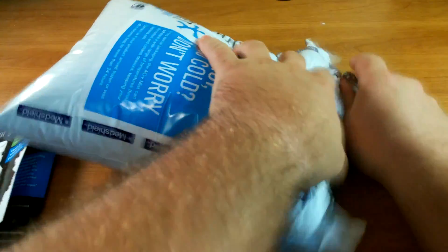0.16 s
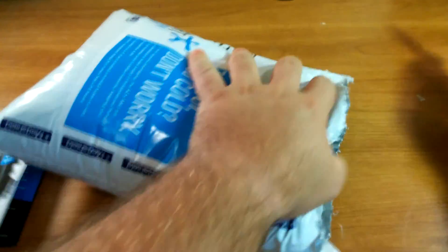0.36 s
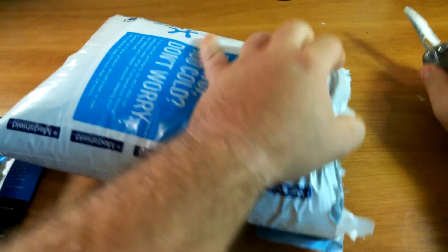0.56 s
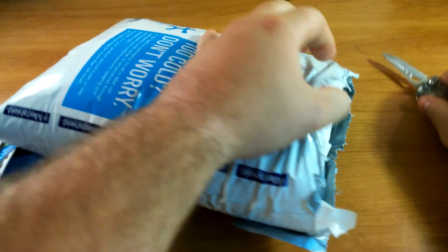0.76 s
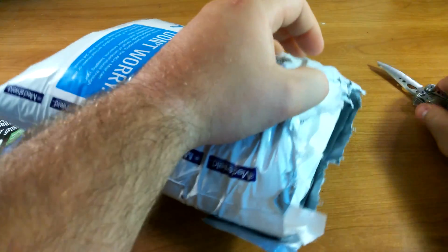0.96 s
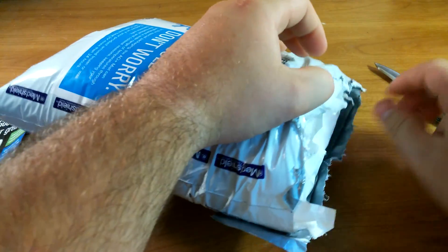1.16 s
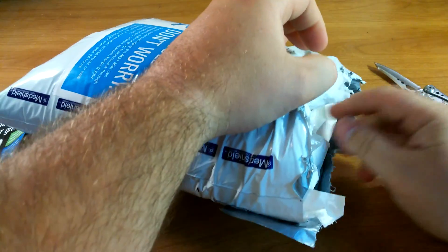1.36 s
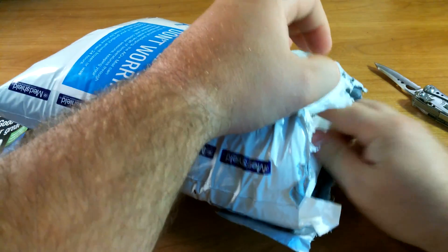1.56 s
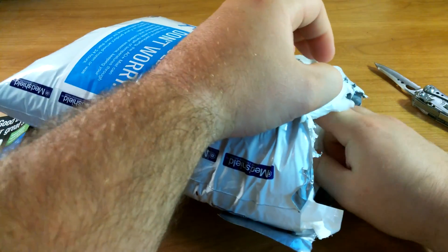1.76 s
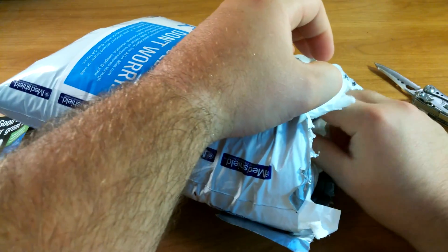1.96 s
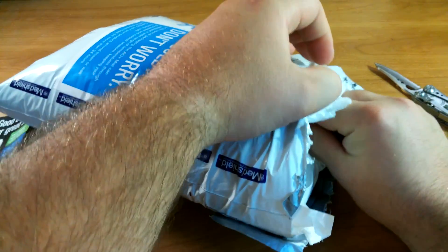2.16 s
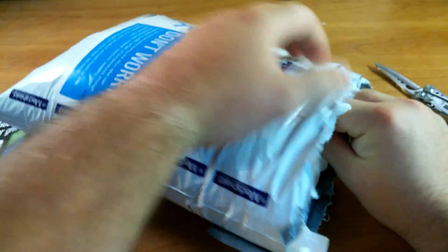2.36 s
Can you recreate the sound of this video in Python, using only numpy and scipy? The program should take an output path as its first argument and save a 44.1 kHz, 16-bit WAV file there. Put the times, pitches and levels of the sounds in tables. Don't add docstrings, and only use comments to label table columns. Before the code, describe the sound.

Close-up crinkling of a thick plastic mailing bag: a strained start, sharp rip with a boomy thump, more pops, a steel tool rattling onto the wooden table, then irregular crackles in a small quiet room.

```python
import sys
import numpy as np
from scipy import signal
from scipy.io import wavfile
from scipy.ndimage import uniform_filter1d

SR = 44100
rng = np.random.default_rng(int(sys.argv[2]) if len(sys.argv) > 2 else 0)


def volts_from_db(level):
    exponent = np.asarray(level, float) / 20
    return 10 ** exponent


def wav_record(signal):
    frames = np.transpose(np.atleast_2d(signal))
    bounded = np.clip(frames, -1, 1)
    quanta = np.round(bounded * 32767).astype(np.int16)
    wavfile.write(sys.argv[1], SR, quanta)


N = 105840

# (frequency [Hz], level [dB])
HUSH_SPECTRUM = [(15, -50), (25, 37), (175, -40), (335, 10.5), (659, -27.5), (863, 9.5), (1290, -36.5),
                 (16000, -11)]
# (frequency [Hz], t60 [s])
ROOM_DECAY = [(100, 0.58), (1000, 0.11), (5000, 0.33), (14000, 0.049)]
# (frequency [Hz], left minus right [dB])
STEREO_LEAN = [(300, 0.5), (2000, 0.5), (9000, -11), (14000, -3)]
# (time [s], strength [dB], rattle t60 [s], boom level [dB], contact [s])
TABLE_BLOWS = [
    (0.2261, -2, 0.088, -6, 0.00044),
    (.868, -9, 0.17, -13.5, 0.000031),
    (0.91, -17.5, 0.18, -17, 0.00029),
    (0.975, -21, 0.1, -32, 0.0016),
    (1.0635, -17, 0.057, -19.5, 0.00063),
    (1.088, -16.5, 0.13, -26, 0.0002),
]
# (frequency [Hz], level [dB], t60 [s])
BARE_TABLE_MODES = [(270, -5, .035), (335, 4, .09), (420, 7, .035), (540, 3, .03), (820, 11, .045),
                    (960, 1, .03), (1050, 5, .015), (1300, 2, .018), (1650, 0, .02), (2080, -2, .02)]
# (frequency [Hz], level [dB], t60 [s])
DAMPED_TABLE_MODES = [(353, 0, .05), (582, 1, .025), (666, 6.5, 0.018), (933, 12.5, 0.019),
                      (1211, 5, 0.035), (1525, 1.5, .02), (1770, 2.5, .03)]
# (time [s], rustle level [dB], treble share [dB])
TEAR_EFFORT = [(0, -38, -3), (.1, -45.5, -11.5), (.192, -52.5, -6), (.2, -29.5, 3), (.235, -20.5, -16.5),
               (.3, -33.5, -2.5), (.39, -38, -0.5), (.44, -43, -10.5), (.48, -30, -3.5), (.58, -43, -7.5),
               (.72, -41, -15), (.76, -55.5, -13), (.86, -52.5, -12), (.88, -44, 2.5), (1.17, -53, -17.5),
               (1.245, -47.5, -15), (1.27, -70.5, -7)]
# (time [s], rustle level [dB], treble share [dB])
FINGER_EFFORT = [(1.51, -67, -15.5), (1.62, -47.5, -13.5), (1.7, -51, -5), (1.79, -37.5, -23),
                 (1.88, -58, -29), (1.93, -41, -16), (2.03, -49.5, -11), (2.12, -61, -32),
                 (2.372, -62, -3.5), (2.385, -39.5, 2.5)]
# (frequency [Hz], level [dB])
PADDING_SPECTRUM = [(40, -47), (120, -12.5), (400, 3.5), (650, -6), (900, 2.5), (1900, -5.5), (3500, -8),
                    (7000, -17)]
# (frequency [Hz], level [dB])
FILM_SPECTRUM = [(200, -30.5), (1500, 3.5), (3000, -5), (5000, -2.5), (8500, -6.5), (11000, -9.5),
                 (13000, -22), (16000, -20)]
# (time [s], peak level [dB], pitch [Hz])
TEAR_POPS = [(0.006, -31, 846), (0.055, -24.5, 1380), (0.377, -21.5, 980), (0.401, -25, 506),
             (0.467, -31, 974), (0.473, -17.5, 460), (0.4915, -11.5, 900), (0.492, -17.5, 440),
             (0.521, -15.5, 1290), (0.564, -26.5, 422), (0.596, -16, 930), (0.609, -23.5, 420),
             (0.62, -27.5, 555), (0.71, -29, 493), (1.237, -36.5, 330)]
# (time [s], peak level [dB], pitch [Hz])
SEAM_POPS = [
    (0.1957, -20, 963),
    (0.2006, -18, 1094),
]
# (time [s], peak level [dB], pitch [Hz])
FINGER_POPS = [(1.527, -36, 434), (1.556, -35.5, 1110), (1.616, -28.5, 425), (1.657, -15.5, 1065),
               (1.691, -30, 475), (1.773, -26, 900), (1.791, -17, 1000), (1.806, -22.5, 810),
               (1.842, -22.5, 1240), (1.915, -25, 1090), (1.934, -22.5, 891), (1.952, -21, 444),
               (1.953, -17.5, 846), (1.998, -30, 400), (2.074, -36.5, 383), (2.161, -36, 388),
               (2.181, -29, 1030), (2.307, -45.5, 388), (2.315, -59, 364), (2.376, -17.5, 907),
               (2.387, -24, 337)]
# (time [s], peak level [dB], pitch [Hz])
MORE_POPS = [(0.368, -26, 527), (0.48, -29, 854), (0.506, -19, 1320), (0.553, -30, 425), (0.573, -37, 842),
             (0.699, -32, 495), (0.742, -36.5, 450), (0.811, -36, 900), (1.026, -37, 385),
             (1.183, -40, 305), (1.318, -43.5, 877), (1.425, -54, 336), (1.452, -48.5, 380),
             (1.487, -50, 993), (1.534, -41, 423), (1.577, -44, 326), (1.689, -26, 960), (1.702, -37, 473),
             (1.742, -32, 820), (1.756, -53, 890), (1.765, -32, 413), (1.839, -27, 1390),
             (1.865, -46, 1160), (1.891, -33, 1290), (1.969, -43, 509), (1.978, -31, 454),
             (2.011, -33.5, 493), (2.054, -46, 318), (2.106, -45, 398), (2.238, -41, 850),
             (2.269, -51.5, 417)]
# (time [s], peak level [dB], pitch [Hz])
FURTHER_POPS = [
    (1.918, -27, 890),
    (2.171, -43, 496),
    (2.281, -62, 400),
    (2.356, -52, 900),
]
# (time [s], peak level [dB])
TEAR_SNAPS = [(0.015, -22.5), (0.198, -19.5), (0.2, -27), (0.346, -15.5), (0.381, -17.5), (0.4671, -21),
              (0.4785, -44), (0.5954, -21.5), (0.6114, -26), (0.6506, -23.5), (0.6657, -27), (0.7077, -27),
              (0.87, -25.5), (0.9044, -24.5), (0.9434, -23.5), (0.9709, -23.5), (1.0872, -32),
              (1.1005, -34.5)]
# (time [s], peak level [dB], centre [Hz])
FINGER_SNAPS = [(1.3213, -38.5, 3450), (1.3347, -39.5, 2720), (1.5347, -31, 2750), (1.5544, -28, 5020),
                (1.5855, -25, 9100), (1.6114, -15, 2720), (1.6286, -22.5, 2880), (1.6547, -17.5, 2540),
                (1.7163, -18, 4240), (1.7353, -21, 3210), (1.7484, -14, 8900), (1.7744, -17.5, 5470),
                (1.7931, -24.5, 4890), (1.8454, -28.5, 2950), (1.8931, -29, 2850), (1.9159, -22.5, 2740),
                (1.9205, -19, 2870), (1.952, -19, 7100), (1.9773, -23, 2720), (2.0166, -20, 2920),
                (2.0797, -40, 3270), (2.161, -34.5, 2800), (2.2137, -35.5, 3150), (2.377, -23.5, 3200)]
# (time [s], peak level [dB], centre [Hz])
FURTHER_SNAPS = [
    (1.7565, -18.5, 6200),
    (1.5595, -30, 2500),
    (1.661, -25, 3200),
    (1.7135, -31, 5300),
]
# (time [s], peak level [dB], centre [Hz])
MORE_SNAPS = [(0.046, -48, 2340), (0.448, -27, 2720), (0.479, -20, 3040), (0.4905, -28, 2650),
              (0.5374, -24, 2120), (0.5554, -28, 2740), (0.6195, -20.5, 2980), (0.701, -23.5, 3240),
              (0.7105, -24, 2220), (0.8116, -47, 2040), (1.1595, -43.5, 2080), (1.4095, -48, 2330),
              (1.5262, -39.5, 2780), (1.782, -30, 4790), (1.888, -35, 2800), (2.0113, -33, 2730),
              (2.1061, -47, 2120), (2.1814, -44, 2130), (2.2388, -46.5, 2760), (2.254, -51, 2700),
              (2.2665, -53.5, 2680), (2.3411, -46, 3030)]
# (frequency [Hz], level [dB])
RIP_SPECTRUM = [(880, -28.5), (1500, 1.5), (3590, -6.5), (3960, -5), (8920, -6), (16000, -23.5)]

BOOM_HZ, THUD_HZ = 119.5, 54
DENT_SPREAD_DB, ALIKE_HZ = 3.0, 600


def evened(x):
    return x / np.sqrt(np.mean(x ** 2) + 1e-20)


def read(points, hz):
    f, value = np.transpose(points)
    return np.interp(np.log(hz + 1), np.log(f + 1), value)


def add(mix, s, sound):
    part = mix[..., max(round(s * SR), 0):][..., :sound.shape[-1]]
    part += sound[..., :part.shape[-1]]


def colour(x, points):
    log_gain = np.log(volts_from_db(read(points, abs(np.fft.fftfreq(4096, 1 / SR)))))
    response = np.fft.ifft(np.exp(np.conj(signal.hilbert(log_gain)))).real[:2048]
    return signal.oaconvolve(x, response)[:len(x)]


def ring(hz, t60, seconds):
    t = np.arange(round(seconds * SR)) / SR
    return volts_from_db(-60 * t / t60) * np.sin(2 * np.pi * hz * t)


def clicks(per_s, spread_db):
    chance = rng.random(N)
    size = rng.exponential(1, N)
    sign = rng.choice([-1., 1.], N)
    return (chance < per_s / SR) * sign * volts_from_db(spread_db * np.minimum(size, 4))


def hush():
    a, b = [colour(noise, HUSH_SPECTRUM) for noise in rng.standard_normal((2, N))]
    return volts_from_db(-64) * evened(np.array([a + 0.71 * b, a - 1.8 * b]))


def room(x):
    hz, t, z = signal.stft(rng.standard_normal((2, SR // 2)), SR, nperseg=256)
    dying = z * volts_from_db(-60 * t / read(ROOM_DECAY, hz)[:, None])
    tail = signal.istft(dying, SR, nperseg=256)[1]
    tail = signal.lfilter([1, -1], [1, -.95], np.pad(tail, ((0, 0), (200, 0))))
    middle = tail.mean(0)
    high_pass = signal.butter(2, ALIKE_HZ / 2, "high", fs=SR)
    tail = middle + signal.lfilter(*high_pass, tail - middle)
    return signal.fftconvolve(x[None], tail / np.linalg.norm(tail[0]), axes=1)[:, :N]


def microphones(x):
    most_turns, lag_s = 0.3, .0001
    hz, t, z = signal.stft(x, SR, nperseg=256, noverlap=192)
    wander = uniform_filter1d(rng.standard_normal(z.shape), size=9, axis=0)
    wander = evened(uniform_filter1d(wander, size=24, axis=1))
    treble = (hz ** 2 / (hz ** 2 + ALIKE_HZ ** 2))[:, None]
    turns = most_turns * wander * treble + (hz * lag_s)[:, None]
    pair = []
    for side in (.5, -.5):
        level = volts_from_db(side * read(STEREO_LEAN, hz))[:, None]
        pair.append(z * level * np.exp(-2j * np.pi * side * turns))
    return signal.istft(np.array(pair), SR, nperseg=256, noverlap=192)[1][:, :N]


def settle():
    start_s, rise_s, level_db, t60 = .25, 0.027, -31, .6
    t = np.maximum(np.arange(N) / SR - start_s, 0)
    rumble = signal.oaconvolve(rng.standard_normal(N), ring(THUD_HZ, 0.085, .1))[:N]
    return evened(rumble) * np.minimum(t / rise_s, 1) * volts_from_db(level_db - 60 * t / t60)


def table():
    detune, boom_lag_s, boom_rise_s = .025, .004, 0.023
    out = np.zeros(N)
    chatter = evened(signal.lfilter([1], [1, -.8], clicks(700, 2.5)))
    t = np.arange(SR // 2) / SR
    boom = ring(BOOM_HZ, .16, .5) + volts_from_db(-12) * ring(BOOM_HZ, .33, .5)
    boom = boom + volts_from_db(-24) * ring(THUD_HZ, .05, .5)
    boom = boom * np.minimum(t / boom_rise_s, 1)
    for k, (s, strength_db, rattle_t60, boom_db, contact_s) in enumerate(TABLE_BLOWS):
        at = round(s * SR)
        push = t * np.exp(-t * 6 / contact_s)
        blow = volts_from_db(strength_db - 60 * t / rattle_t60) * (0.064 * chatter[at:at + len(t)] + (t == 0))
        blow = signal.oaconvolve(blow, push[:400] / push.sum())
        modes = BARE_TABLE_MODES if k else DAMPED_TABLE_MODES
        shift = 1 + detune * rng.uniform(-0.51, 1, len(BARE_TABLE_MODES))
        body = sum(volts_from_db(db) * ring(hz * u, t60, .15) for (hz, db, t60), u in zip(modes, shift))
        add(out, s, signal.oaconvolve(blow, body / abs(body).max()))
        add(out, s + boom_lag_s, volts_from_db(boom_db) * boom)
    return out


def rustle():
    clump_db, hiss_share, shove_db, shove_lag_s = 1.8, .6, -15.5, .03
    s, db, treble_db = np.transpose(list(TEAR_EFFORT) + list(FINGER_EFFORT))
    t = np.arange(N) / SR
    clump = uniform_filter1d(rng.standard_normal((2, N)), 300, 1)
    clump = clump_db * evened(uniform_filter1d(clump, 300, 1))

    dents = np.zeros(N)
    for hz in np.geomspace(200, 5500, num=16):
        dent = ring(hz, 4.8 / hz, 0.0324) * hz
        dents += signal.oaconvolve(clicks(160, DENT_SPREAD_DB), dent)[:N]
    dents = evened(dents) + 0.25 * rng.standard_normal(N)
    dents = evened(colour(dents, PADDING_SPECTRUM)) * volts_from_db(np.interp(t, s, db) + clump[0] + 0.5)

    fizz = evened(clicks(3000, DENT_SPREAD_DB)) + hiss_share * rng.standard_normal(N)
    fizz = evened(signal.lfilter([1], [1, -.6], colour(fizz, FILM_SPECTRUM)))
    fizz = fizz * volts_from_db(np.interp(t, s, db + treble_db) + clump[1] + 1.0)

    slab = ring(BOOM_HZ, 0.21, .1) + 0.27 * ring(THUD_HZ, 0.37, .1)
    shoves = evened(signal.oaconvolve(clicks(210, 3.1), slab)[:N])
    return dents + fizz + shoves * volts_from_db(np.interp(t - shove_lag_s, s, db) + shove_db)


def pops(dents):
    cycles, soft_s, second_db, lag_s = 7, 0.00087, -6, .0018
    out = np.zeros(N)
    high_pass = signal.butter(3, 200, "high", fs=SR)
    for (s, db, hz), u in zip(dents, rng.random((len(dents), 2))):
        pop = ring(hz, cycles / hz, .04)
        pop = pop + volts_from_db(second_db) * ring(hz * (1.58 + u[0]), cycles / hz, .04)
        onset = np.minimum(np.arange(len(pop)) / SR / soft_s, 1)
        pop = signal.lfilter(*high_pass, pop * onset)
        add(out, s + lag_s, np.sign(u[1] - .5) * pop / abs(pop).max() * volts_from_db(db))
    return out


def snaps(creases):
    width, lag_s, tick_t60, crack_t60, tail_t60 = 0.2, .001, .0025, .028, .1
    crack_share, spit_share, tail_db = .2, .1, -22
    out, t = np.zeros(N), np.arange(4000) / SR
    tick = volts_from_db(-60 * t / tick_t60)
    decay = tick + crack_share * volts_from_db(-60 * t / crack_t60)
    tail = volts_from_db(tail_db - 60 * t / tail_t60)
    noise = rng.standard_normal((len(creases), 2, 4000))
    for (s, db, hz), (wide, fizz) in zip(creases, noise):
        band = signal.lfilter(*signal.iirpeak(hz, 1 / width, SR), wide)
        crack = (evened(band) + 0.59 * fizz) * decay + tail * fizz
        spit = spit_share * np.diff(fizz, prepend=0) * tick
        crack = colour(crack, FILM_SPECTRUM) + spit
        add(out, s + lag_s, crack / abs(crack).max() * volts_from_db(db))
    return out


def rip():
    start_s, rise_s, hold_s, t60, level_db = 0.2195, 0.0097, 0.004, 0.19, -13.5
    t = np.arange(N) / SR - start_s
    shape = np.clip(t / rise_s, 0, 1) * volts_from_db(-60 * np.maximum(t - rise_s - hold_s, 0) / t60)
    return volts_from_db(level_db) * shape * evened(colour(clicks(9000, 5.), RIP_SPECTRUM))


def scene():
    centres = rng.uniform(2900, 5600, len(TEAR_SNAPS))
    tear_snaps = [(s, db, hz) for (s, db), hz in zip(TEAR_SNAPS, centres)]
    near = settle() + table() + rustle()
    near = near + pops(list(TEAR_POPS) + list(SEAM_POPS)) + pops(FINGER_POPS)
    near = near + pops(list(MORE_POPS) + list(FURTHER_POPS))
    near = near + snaps(tear_snaps) + snaps(list(FINGER_SNAPS) + list(FURTHER_SNAPS))
    near = near + snaps(MORE_SNAPS) + rip()
    return hush() + volts_from_db(-12) * room(near) + microphones(near)


def roll_off(x):
    return signal.sosfilt(signal.butter(12, 16790, fs=SR, output="sos"), x)


def record(dry):
    bass_cut = signal.butter(2, 55, "high", fs=SR, output="sos")
    mix = np.tanh(signal.sosfilt(bass_cut, dry))
    mix = signal.oaconvolve(mix, signal.firwin(255, 15850, fs=SR)[None], "same")
    return roll_off(mix)


dry = scene()
out = record(dry)
wav_record(out)
```